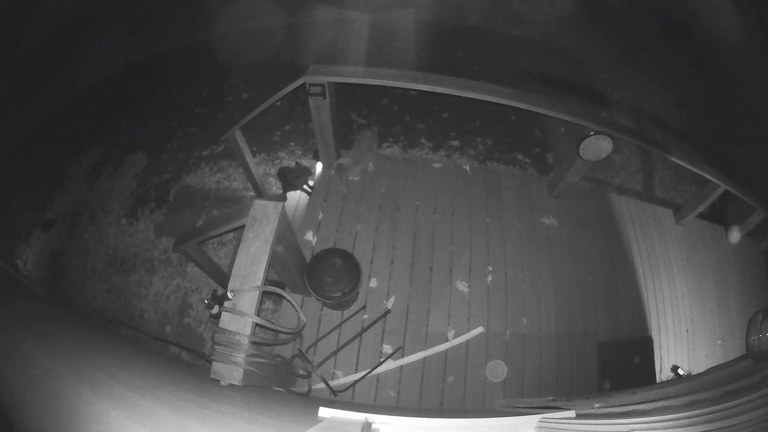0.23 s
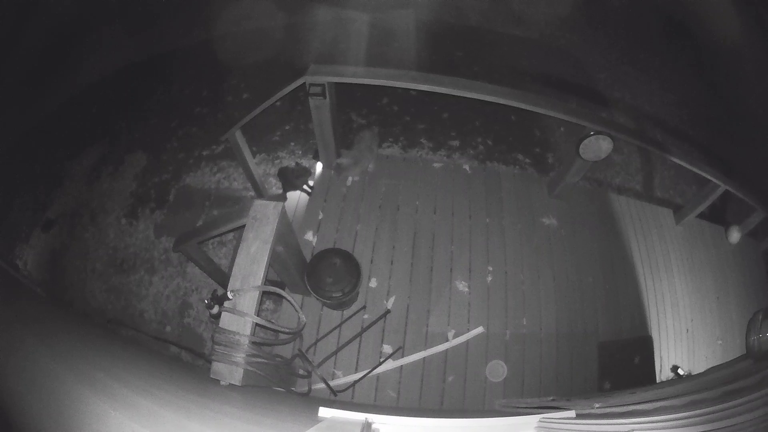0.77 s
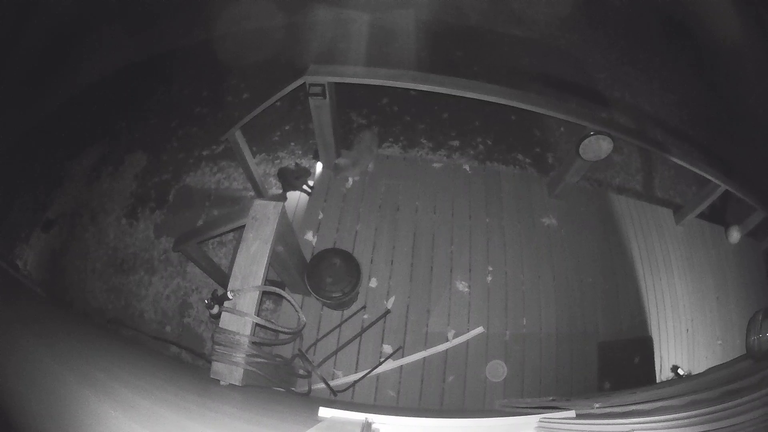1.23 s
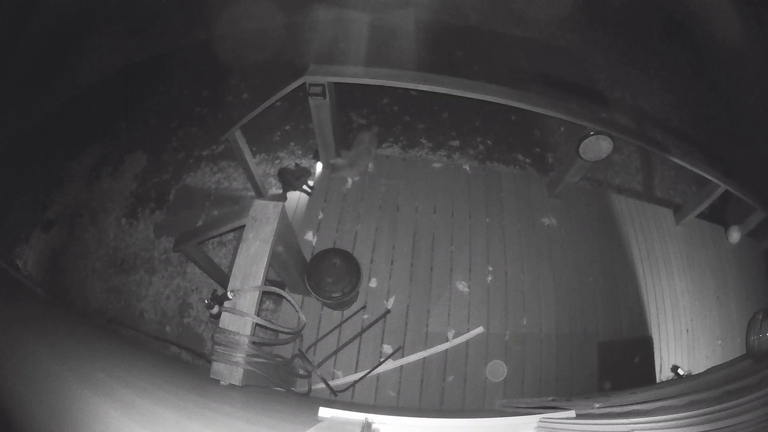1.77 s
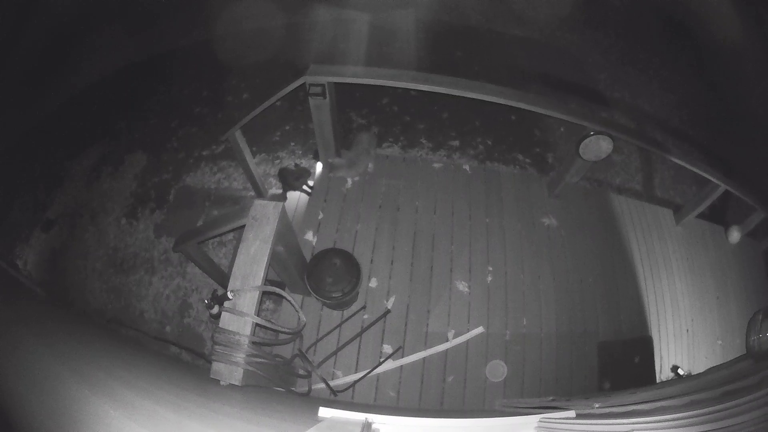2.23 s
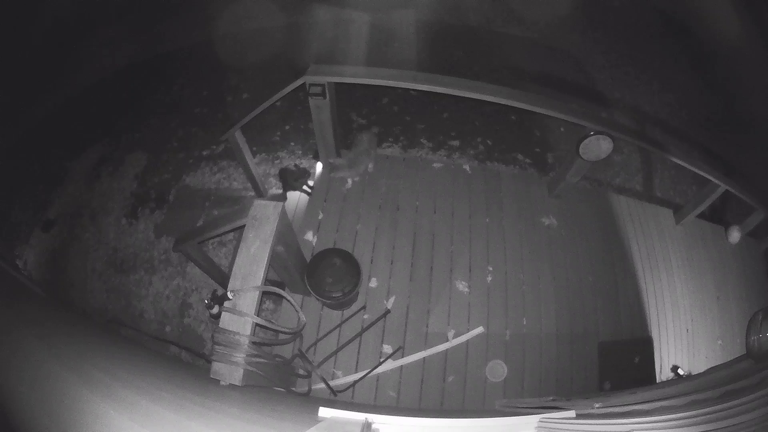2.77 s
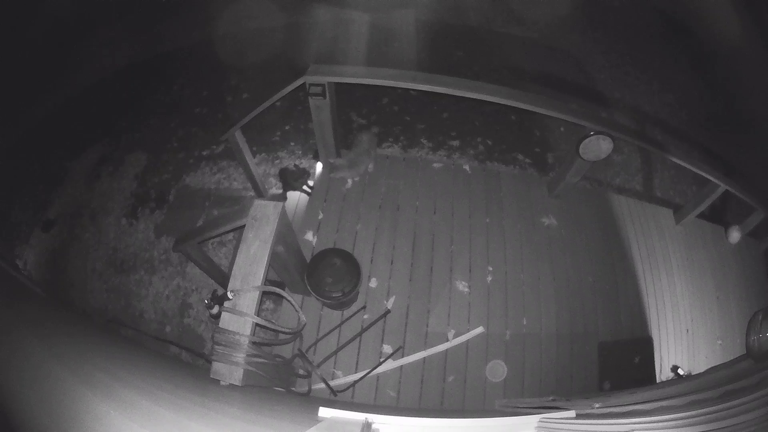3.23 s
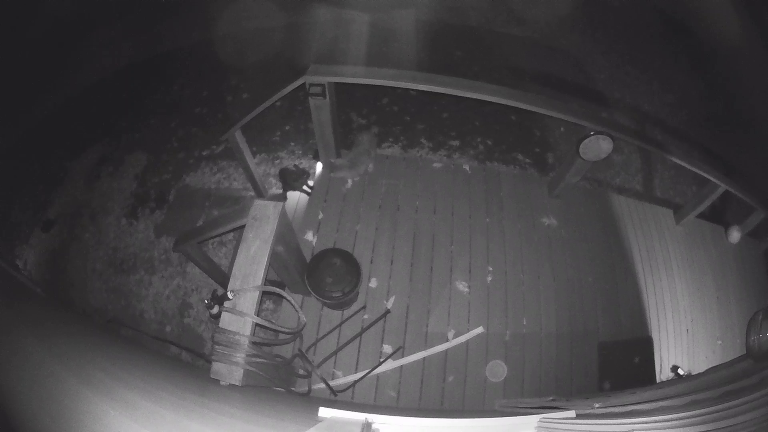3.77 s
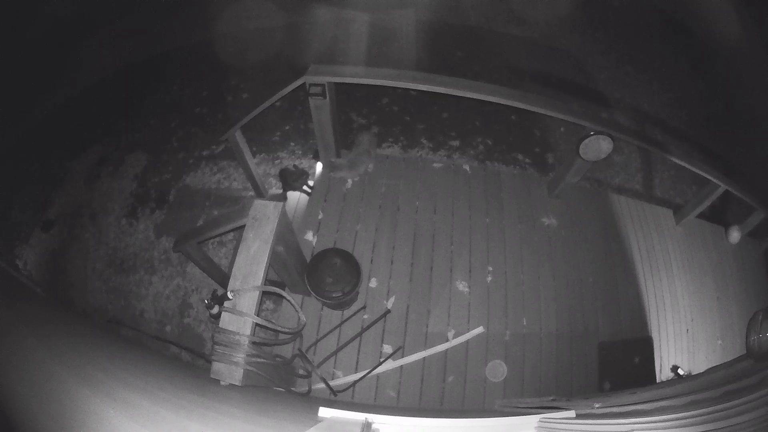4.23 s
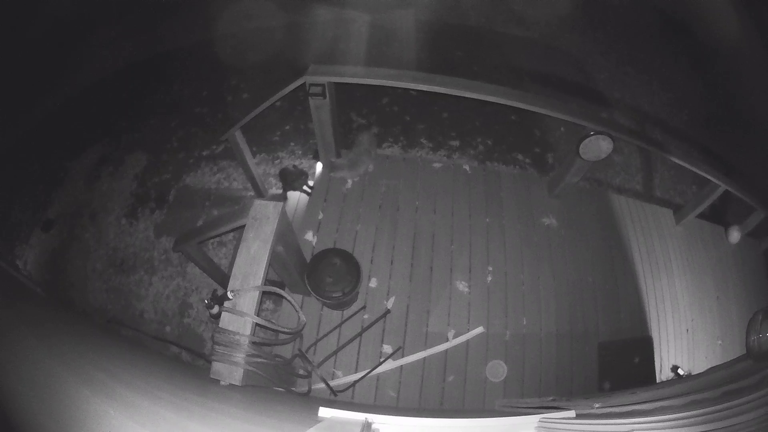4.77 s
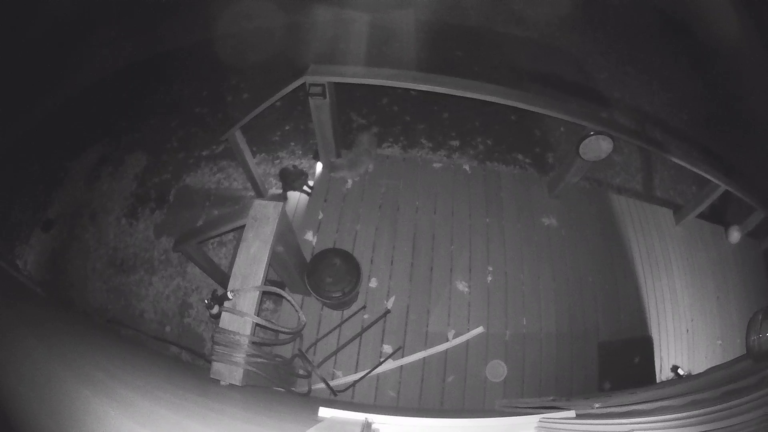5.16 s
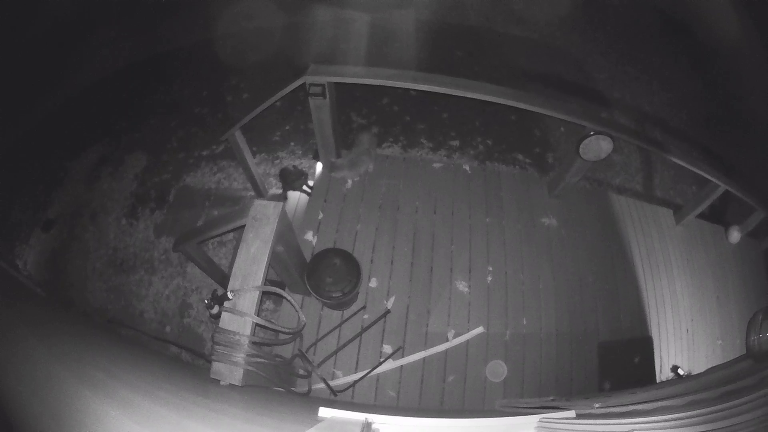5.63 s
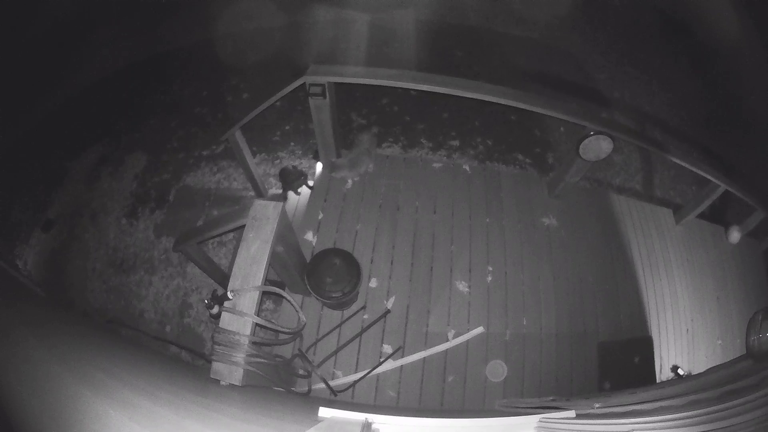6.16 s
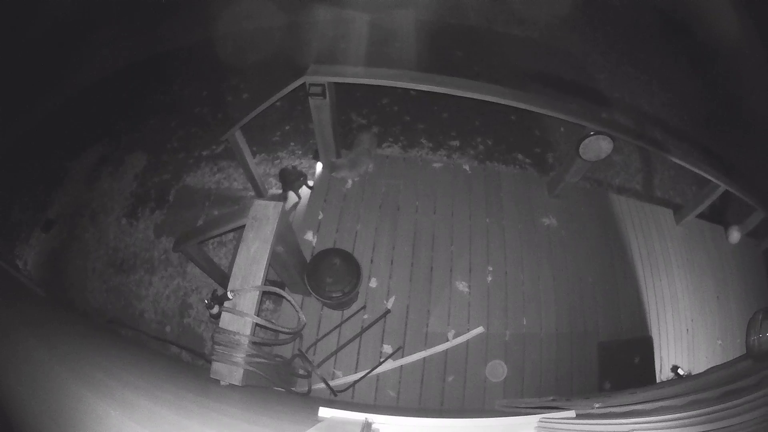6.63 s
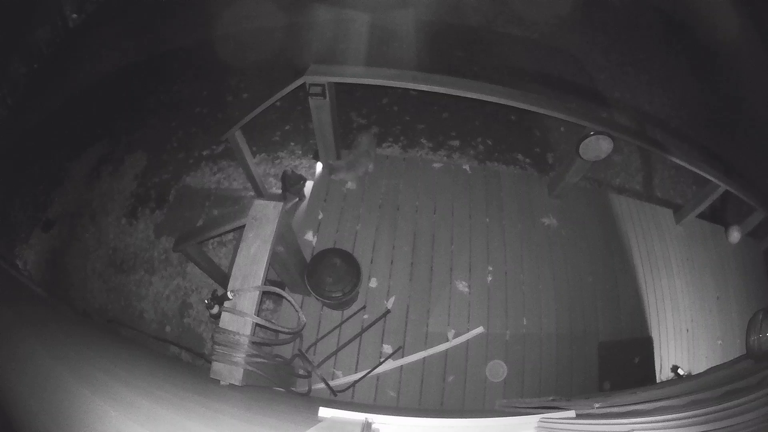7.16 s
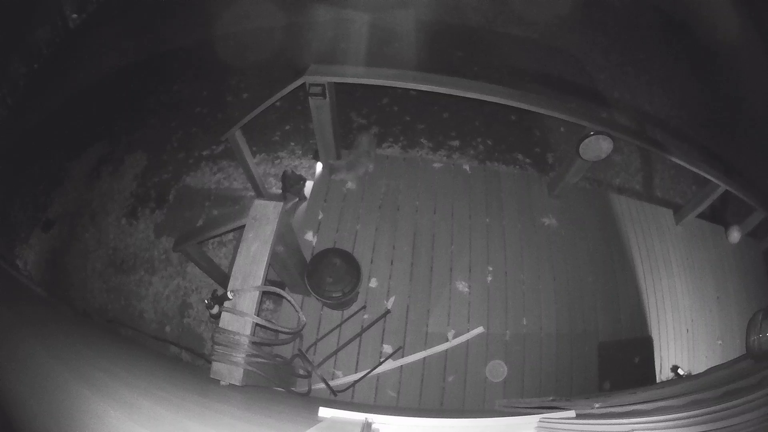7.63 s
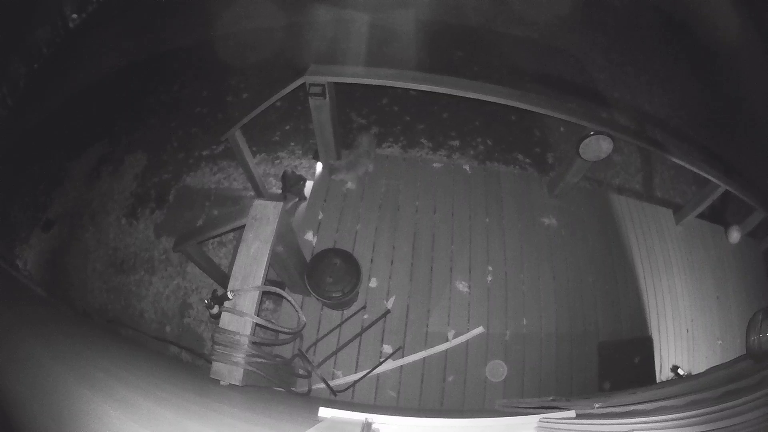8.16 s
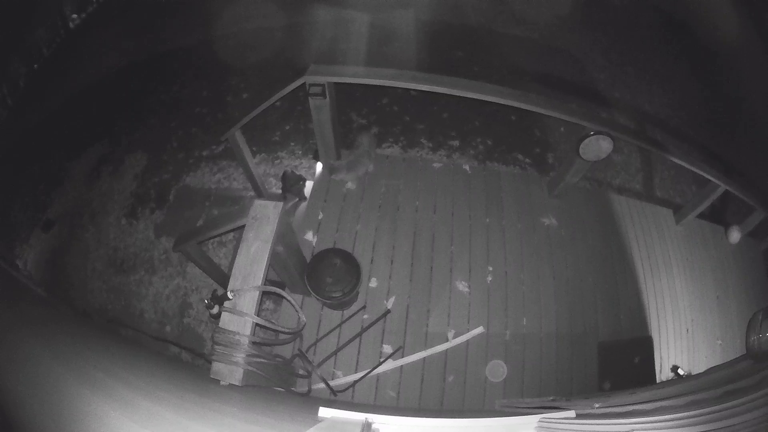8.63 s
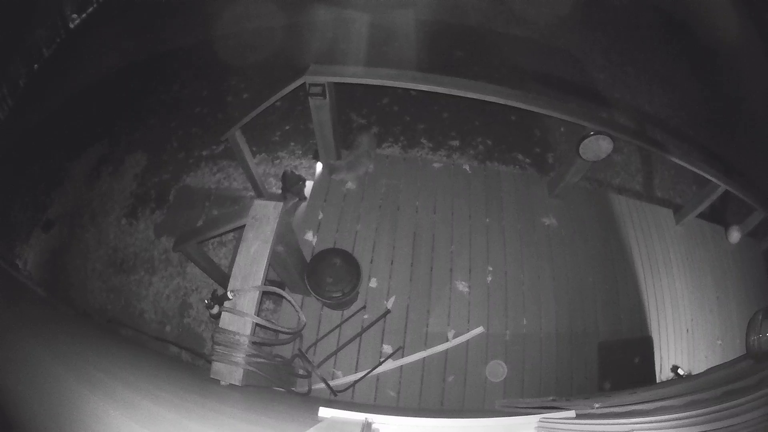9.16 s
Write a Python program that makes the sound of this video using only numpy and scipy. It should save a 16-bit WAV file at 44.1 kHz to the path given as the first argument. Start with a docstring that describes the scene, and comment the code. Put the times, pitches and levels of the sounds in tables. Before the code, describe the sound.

A quiet night yard by a wooden deck, heard through a small security camera with slightly dull top end, faint ticking, crackle and a thin high whine. From 0 to 1.5 seconds a cat howls softly and raspily, wavering up, then sliding down. At about 0.9 a second cat cuts in, far louder, swooping up to a bright, hard, nasal yowl held with shifting vowel colour, gradually sinking and dropping off near 3.9. Faint crickets chirp, clearer around 3, 6 and 9. Tiny dry snaps come at 4.3 to 4.6. At 5.1 another strong howl swoops up, peaks near 6, and falls by 6.8 into a soft, closed-mouth moan that sags to a low growl by 8.7. From about 6.9 a distant low motor drone and rustling, flickering hiss swell to the end. Close, dry echoes, little reverberation.

```python
"""Two cats yowl at each other by a wooden deck at night, heard by a security camera.
One howls, the second cuts in over it and holds a long howl: harmonics through gliding resonances, and rasp.
Little snaps of noise follow on the deck, then a last howl sinks into a low, closed-mouth moan.
Crickets whistle faintly and the camera ticks, crackles and whines throughout over a bed of night noise;
a motor's drone of wavering sines and a two-coloured noise hiss swell towards the end."""
import sys
import numpy as np
from scipy import signal
from scipy.fft import rfft, irfft, next_fast_len
from scipy.io import wavfile
from scipy.ndimage import uniform_filter1d

SR = 44100
rng = np.random.default_rng(int(sys.argv[2]) if len(sys.argv) > 2 else 0)


def persist_wave(psi):
    """Save psi, clipped to +-1, as 16-bit WAV."""
    counts = np.round(np.clip(psi, -1, 1) * 32767).astype(np.int16)
    wavfile.write(sys.argv[1], SR, np.atleast_2d(counts).T)


N = 414082
TIME = np.arange(N) / SR


def gain_of(db):
    """Amplitude factor of a level in dB."""
    return 10 ** (np.asarray(db) / 20)


def evened(x):
    """x scaled to rms 1."""
    return x / np.sqrt(np.mean(x ** 2) + 1e-20)


def read(points, hz):
    """A spectrum's value at hz, interpolated on a log-frequency axis."""
    f, value = np.transpose(points)
    return np.interp(np.log(hz + 1), np.log(f + 1), value)


def add(mix, start_s, sound):
    """Adds sound to mix in place, cut at the end of mix."""
    part = mix[max(round(start_s * SR), 0):][:len(sound)]
    part += sound[:len(part)]


def coloured(x, spectrum):
    """x filtered by a spectrum in dB, at rms 1."""
    size = next_fast_len(len(x))
    gain = gain_of(read(spectrum, np.fft.rfftfreq(size, 1 / SR)))
    return evened(irfft(rfft(x, size) * gain, size)[:len(x)])


def wander(t, per_s):
    """Random curve of rms 1: straight lines between per_s random knots a second."""
    knots = rng.standard_normal(4000)
    return evened(np.interp((t - t[0]) * per_s, np.arange(len(knots)), knots))


def follow(rows):
    """Sample times spanned by a table and each of its curves, with rounded corners."""
    s, *columns = np.transpose(rows)
    t = np.arange(s[0], s[-1], 1 / SR)
    return t, *(uniform_filter1d(np.interp(t, s, c), size=700, mode="nearest") for c in columns)


def bump(t, centre_s, half_s):
    """A bell of height 1 around centre_s."""
    return np.exp(-((t - centre_s) / half_s) ** 2)


def echoed(x, reflections):
    """Hard surfaces return the sound a little later."""
    out = x.copy()
    for delay_s, strength in reflections:
        add(out, delay_s, strength * x)
    return out


def cats():
    """Three howls, the second overlapping the first, and the closing moan, in the yard."""
    # swoop, waver and sink: (time [s], pitch [Hz])
    first_pitch = [(0, 694.4), (.25, 707.5), (.33, 683), (.52, 684.5), (.75, 763.2), (.87, 756),
                   (1.1, 702.3), (1.32, 665), (1.47, 593), (1.55, 433)]
    answer_pitch = [(0.9, 462.4), (0.99, 611.7), (1.02, 690.5), (1.05, 720.3), (1.08, 712.7), (1.17, 739.4),
                    (1.44, 709.6), (1.53, 688.7), (1.86, 704.7), (2.25, 657.4), (2.4, 606.6), (2.43, 616),
                    (2.49, 584), (2.67, 569.3), (2.73, 556.6), (3.03, 554.2), (3.3, 563.0), (3.66, 532.5),
                    (3.75, 477), (3.81, 400), (3.87, 285)]
    last_pitch = [(5.1, 189), (5.15, 338), (5.19, 455), (5.28, 582.4), (5.4, 604.8), (5.46, 608.7),
                  (5.67, 631), (5.73, 655.6), (5.79, 662.5), (5.97, 671), (6.27, 641.6), (6.57, 609.6),
                  (6.72, 538), (6.78, 520.7), (6.84, 537)]
    # how hard the cat pushes: (time [s], effort [dB], brightness [dB/octave])
    first_effort = [(0, -54, 0), (.16, -57, -1.5), (.35, -56.5, -0.5), (.52, -54.5, 1.5), (.61, -52.5, 3.5),
                    (.68, -50, 6.5), (.82, -41.5, 5.5), (1.08, -50.5, 6.5), (1.38, -69, -6),
                    (1.502, -59, 1.5), (1.548, -87, -12)]
    answer_effort = [(0.901, -86, 5), (0.93, -57.5, 20), (0.991, -38, 4.5), (1.05, -30.5, 19),
                     (1.44, -28.5, 10), (1.5, -33.5, 3.5), (1.53, -33, 7), (2.07, -34.5, 6.9),
                     (2.19, -33, 1), (2.58, -37, -7), (2.609, -44.5, -9), (2.94, -48.5, -7.5),
                     (3.3, -40, -5.5), (3.48, -48, -6), (3.6, -44.5, -7.5), (3.66, -54, -9),
                     (3.75, -48, -16), (3.86, -62.5, -14)]
    last_effort = [(5.1, -80, -18.5), (5.16, -71.5, -17), (5.219, -44.5, -10), (5.46, -40, -0.5),
                   (5.52, -34.6, -1.5), (5.731, -31.5, 8.5), (5.97, -33.5, 13.5), (6.059, -30, 7.5),
                   (6.509, -32.4, 3), (6.599, -35, -1.2), (6.66, -33.5, 1), (6.751, -44, -1.5),
                   (6.81, -46.5, -4), (6.84, -56, -5)]
    # vowel that the strong harmonics glide through: (frequency [Hz], level [dB])
    first_vowel = [(450, -1), (750, -3), (1400, 3), (1800, -8.5), (2200, 2), (2800, -7), (3700, -16)]
    answer_vowel = [(300, -16), (600, -28.5), (850, -6), (1150, 1), (1400, -6.5), (1700, -4), (2100, -4),
                    (2450, -6), (2900, -17), (3300, -34.5), (3700, -37)]
    last_vowel = [(250.0, -8), (600.0, -18.5), (850.0, -20.5), (1100.0, -5), (1350.0, 3.5), (1650.0, -14),
                  (2000.0, -9), (2450.0, 4), (2800.0, -25), (3100.0, -30.5), (3400.0, -32)]
    # bounces right beside the cat: (delay [s], strength [ratio])
    first_bounces = [(0.00364, 0.12), (0.00566, 0.12), (0.00634, 0.12), (0.00682, 0.12), (0.00884, 0.12)]
    answer_bounces = [(0.00128, 0.35), (0.00212, 0.35), (0.0037, 0.12), (0.0053, 0.22), (0.0082, 0.12)]
    last_bounces = [(0.00136, 0.22), (0.00266, 0.12), (0.00278, 0.35), (0.00298, 0.22), (0.00372, 0.12)]
    # resonances moved by jaw and tongue:
    # (time [s], lower level [dB], lower frequency [Hz], upper level [dB], upper frequency [Hz])
    first_mouth = [(0, -61.5, 6000, -68, 7700), (.2, -65, 5170, -82, 7600), (.4, -59, 5000, -80, 7500),
                   (.6, -63, 5900, -60, 7600), (.8, -47, 5500, -59.5, 7730), (1, -57.5, 5895, -56.5, 7500),
                   (1.151, -49, 5800, -61, 7150), (1.55, -85, 5480, -74, 7160)]
    answer_mouth = [(.92, -70, 5000, -68, 7000), (1, -56, 5140, -51, 7200), (1.25, -46.5, 5900, -45, 7500),
                    (1.651, -63, 5350, -43, 7120), (2, -52.5, 5560, -43.5, 7350),
                    (2.238, -41, 5960, -46, 8050), (2.4, -49.5, 5460, -49, 8640),
                    (2.62, -48, 5320, -50, 7250), (2.9, -52.5, 5200, -61, 6600),
                    (3.15, -50, 4600, -51.5, 6020), (3.318, -58.5, 4480, -47.5, 6170),
                    (3.6, -50.5, 5020, -49.5, 5840), (3.72, -53, 4600, -64, 6800),
                    (3.869, -89, 4330, -76, 5950)]
    last_mouth = [(5.15, -88, 5440, -75, 7590), (5.244, -61, 5200, -49, 6940),
                  (5.352, -56, 5540, -39.5, 6630), (5.418, -55, 4740, -39, 7100),
                  (5.658, -52.5, 4770, -42.5, 8230), (5.766, -56, 5360, -42.5, 6950),
                  (6.096, -50, 5360, -46.5, 6600), (6.184, -51, 5350, -44, 8270),
                  (6.476, -45, 5340, -46, 6640), (6.562, -44, 5370, -45, 7670),
                  (6.744, -55, 5200, -56, 7600), (6.84, -65, 5880, -58, 6460)]
    # colour of the rasp: (frequency [Hz], relative level [dB])
    first_rasp = [(600, -43.5), (1400, -29), (1700, -8), (1900, 2), (2150, -9), (2600, -23), (3500, -19),
                  (4300, -20), (5600, -24), (7600, -29), (9500, -38), (14000, -28)]
    answer_rasp = [(500, -19.5), (1100, -54), (1480, -2.5), (1800, -6.5), (2350, 1.5), (3000, -17),
                   (3600, -9), (4300, -11), (5500, -2.5), (7300, -3), (8700, -5), (9800, -45), (14000, -24)]
    last_rasp = [(500, -17), (1100, -24), (1480, 2), (1800, -19), (2350, 9.5), (3000, -49), (3600, -23),
                 (4300, -9), (5500, -5.5), (7300, -1.5), (8700, 0), (9800, -44), (14000, -22)]
    # closed mouth: (time [s], pitch [Hz], fundamental level [dB])
    moan_curve = [(6.82, 536, -68), (7.05, 523, -59), (7.4, 453, -61), (7.65, 430, -59.5), (8, 409, -59),
                  (8.13, 402, -60), (8.28, 364, -54.5), (8.6, 195, -65), (8.66, 175, -76)]

    out = np.zeros(N)
    add(out, *howl(first_pitch, first_effort, first_vowel, first_bounces, first_mouth, first_rasp,
                   jitter=0.0034, shimmer=0.13, overtones_db=-0.5, between_db=2,
                   rasp_db=7.0, doubling_db=10))
    add(out, *howl(answer_pitch, answer_effort, answer_vowel, answer_bounces, answer_mouth, answer_rasp,
                   jitter=0.00198, shimmer=0.14, overtones_db=-3.0, between_db=3.5,
                   rasp_db=-7.5, doubling_db=-22))
    add(out, *howl(last_pitch, last_effort, last_vowel, last_bounces, last_mouth, last_rasp,
                   jitter=0.0019, shimmer=0.084, overtones_db=-3.5, between_db=2.0,
                   rasp_db=-8.0, doubling_db=-20))
    add(out, *moan(moan_curve))
    return yard(out, t60_s=.25, wet_db=-21)


def howl(pitch, effort, vowel, bounces, mouth, rasp, jitter, shimmer,
         overtones_db, between_db, rasp_db, doubling_db):
    """Vocal folds on a wavering pitch: strong harmonics, overtones, rasp, and brass in upward swoops."""
    # hard surfaces near the cats: (delay [s], strength [ratio])
    echoes = [(.0031, 0.11), (.0074, 0.17), (0.0136, 0.14), (0.019, 0.056), (.034, 0.093)]
    # roughness added in a fast slide
    slide_jitter, slide_shimmer, slide_rasp, slide_echo = 0.00382, 0.58, 0.35, 0.7
    clearing = 0.49  # dB of rasp lost per dB that the effort drops

    t, hz = follow(pitch)
    s, *columns = np.transpose(effort)
    effort_db, brightness = (np.interp(t, s, c) for c in columns)

    # 0 below 0.6 octaves/s, 1 above 2.6: the voice cracks and flutters where its pitch slides fast
    octaves_per_s = abs(np.gradient(np.log2(hz))) * SR
    slide = np.clip(octaves_per_s / 2 - .3, 0, 1)
    jitter = jitter + slide_jitter * slide
    shimmer = shimmer + slide_shimmer * slide
    wavering_hz = hz * (1 + jitter * wander(t, 60) + .0012 * wander(t, 400))
    phase = 2 * np.pi * np.cumsum(wavering_hz) / SR

    low = strong_harmonics(t, hz, phase, effort_db, brightness, vowel, shimmer)
    low = echoed(low, bounces)
    # in a slide the later echoes lag at another pitch and beat against the voice
    low = low + slide_echo * slide * (echoed(low, echoes) - low)
    rising = slide * (np.gradient(hz) > 0)
    low = low + rising ** 2 * gain_of(effort_db) * echoed(brass(hz, phase), echoes)

    high, strain = overtones(t, hz, phase, mouth, between_db)
    air, halves = throat_rasp(t, phase, rasp)
    # the voice clears when the cat eases off
    clear = gain_of(clearing * (effort_db - effort_db.max()))
    rough_mix = gain_of(rasp_db) * (1 + slide_rasp * slide) * air + gain_of(doubling_db) * halves
    rough = strain * clear * rough_mix

    voice = np.sqrt(2) * (low + gain_of(overtones_db) * echoed(high, echoes)) + rough
    fade_out = np.clip((t[-1] - t) / 0.018, 0, 1)
    return t[0], voice * fade_out


def strong_harmonics(t, hz, phase, effort_db, brightness, vowel, shimmer):
    """Five lowest harmonics by effort and vowel; single ones dip or flare as echoes cancel or add."""
    # brief dips and flares: (time [s], half length [s], harmonic [number], change [dB])
    dips_and_flares = [(0.036, 0.058, 2, 0.5), (0.227, 0.1, 2, -15.5), (0.24, 0.057, 3, -23),
                       (.25, 0.14, 4, 7.5), (0.604, 0.025, 2, 7.5), (0.977, 0.021, 1, 3.5),
                       (0.992, 0.026, 3, 7.5), (1.496, 0.019, 2, -12), (1.797, 0.1, 4, 5),
                       (1.864, 0.031, 2, 3.5), (1.935, 0.03, 2, -11), (2.22, 0.073, 2, 5.5),
                       (2.293, 0.015, 4, -15), (2.465, 0.15, 5, 8.5), (2.532, 0.011, 2, -31),
                       (2.572, 0.02, 2, 4.5), (2.615, 0.015, 2, -7), (2.695, 0.014, 2, 5),
                       (3.395, 0.1, 4, 6.5), (5.162, 0.019, 4, 13), (5.273, 0.016, 2, 1),
                       (5.385, .035, 4, 6), (5.45, 0.033, 4, -4), (5.304, 0.006, 2, -17),
                       (5.338, 0.039, 2, 6), (5.416, 0.03, 3, 11), (6.664, 0.025, 2, 9),
                       (6.746, 0.01, 2, -18), (6.774, 0.012, 2, 8)]
    out = np.zeros(len(t))
    for k in range(1, 6):
        octaves = np.log2(k / 2.5)
        change_db = sum(db * bump(t, at_s, half_s) for at_s, half_s, which, db in dips_and_flares
                        if round(which) == k and t[0] < at_s < t[-1])
        level_db = effort_db + brightness * octaves + read(vowel, k * hz) + change_db + .5 * wander(t, 14)
        size = gain_of(level_db) * (1 + shimmer * wander(t, 60))
        out += size * np.cos(k * phase + rng.uniform(0, 2 * np.pi))
    return out


def brass(hz, phase):
    """Harmonics 3 to 10 through a fixed spectrum: the brassy voice of a fast upward swoop."""
    # level against the effort: (frequency [Hz], level [dB])
    spectrum = [(400, -24), (1000, -16), (1800, 0.5), (2400, -7), (3100, -26), (3600, -21.5), (4300, -21),
                (6000, -41)]
    return sum(gain_of(read(spectrum, k * hz)) * np.cos(k * phase + rng.uniform(0, 2 * np.pi))
               for k in range(3, 11))


def overtones(t, hz, phase, mouth, between_db):
    """High harmonics glide through two moving resonances, so each swells and fades in turn."""
    # passed away from the resonances: (frequency [Hz], level [dB])
    throat = [(2500, -7), (3600, -25), (4100, -23), (4500, -21), (5500, -8), (7000, -12.5), (8200, -14.5),
              (8900, -8.5), (9600, -19), (10600, -24), (11600, -24), (13300, -15)]
    roll_off_db = 11  # per octave above the upper resonance
    attack_s = 0.023  # the overtones come in just after the voice
    width_hz, swell_db, flutter_db = 404, 3, 1.2

    s, *columns = np.transpose(mouth)
    lower_db, lower_hz, upper_db, upper_hz = (np.interp(t, s, c) for c in columns)
    attack = np.minimum((t - t[0]) / attack_s, 1) ** 2
    out = np.zeros(len(t))
    for k in range(6, 22):
        # away from the resonances, low overtones lean to the lower one, high overtones to the upper
        upper_share = np.interp(k * hz, [4500, 8000], [.25, .85])
        base_db = lower_db + upper_share * (upper_db - lower_db)
        above_db = -roll_off_db * np.log2(np.maximum(k * hz / upper_hz, 1))
        size = gain_of(base_db + between_db + above_db + read(throat, k * hz))
        for centre_hz, db in (lower_hz, lower_db), (upper_hz, upper_db):
            resonance = gain_of(db) / (1 + (abs(k * hz - centre_hz) / width_hz) ** 2.5)
            size = np.hypot(size, resonance)
        unsteady_db = swell_db * wander(t, 7.12) + flutter_db * wander(t, 60)
        out += size * gain_of(unsteady_db) * np.cos(k * phase + rng.uniform(0, 2 * np.pi))
    return attack * out, attack * gain_of(upper_db)


def throat_rasp(t, phase, rasp):
    """Air noise let through each cycle, and lines halfway between the harmonics."""
    air = coloured((1 + 0.37 * np.cos(phase)) * rng.standard_normal(len(t)), rasp)
    # strong and weak cycles alternate
    half_lines = sum(np.cos((k + .5) * phase) for k in range(1, 12))
    halves = coloured(half_lines, rasp) * (1 + .5 * wander(t, 56.6))
    return air, halves


def moan(rows):
    """The closed mouth leaves little but the fundamental, which sags to a growl."""
    second_db, third_db = -12.5, -24.5  # against the fundamental
    open_db, shut_s = 35.5, 0.25  # lift of the third harmonic, decaying as the mouth closes

    t, hz, level_db = follow(rows)
    phase = 2 * np.pi * np.cumsum(hz * (1 + 0.01 * wander(t, 49.65))) / SR
    closing_third_db = third_db + open_db * np.exp(-(t - t[0]) / shut_s)
    voice = np.zeros(len(t))
    for k, db in enumerate([0, second_db, closing_third_db], 1):
        voice += gain_of(level_db + db + 0.55 * wander(t, 12)) * np.cos(k * phase)
    return t[0], np.sqrt(2) * voice * signal.windows.tukey(len(t), .03)


def yard(x, t60_s, wet_db):
    """A faint diffuse tail from the garden and the house: decaying noise convolved with x."""
    t = np.arange(SR // 2) / SR
    tail = rng.standard_normal(len(t)) * gain_of(-60 * t / t60_s) * (t > .015)
    return x + gain_of(wet_db) * signal.fftconvolve(x, tail / np.linalg.norm(tail))[:N]


def snaps():
    """Tiny dry snaps on the deck, each about a millisecond or two of bright noise."""
    # (time [s], peak level [dB])
    snap_peaks = [(4.347, -39), (4.394, -49), (4.422, -49), (4.441, -48), (4.605, -47)]
    spectrum = [(2000, -21), (5000, -15), (7000, 1), (8500, -16), (12000, -20)]  # (Hz, dB)
    out, t = np.zeros(N), np.arange(512) / SR
    for at_s, peak_db in snap_peaks:
        burst = rng.standard_normal(len(t)) * np.exp(-abs(t - t.mean()) / 0.0011)
        snap = coloured(burst, spectrum)
        add(out, at_s - t.mean(), gain_of(peak_db) * snap / abs(snap).max())
    return out


def crickets():
    """Each wing stroke is a short whistle that falls in pitch."""
    # (start [s], end [s], pitch [Hz], pulse rate [1/s], pulse length [s], pitch fall [Hz],
    #  level [dB], unevenness [dB])
    songs = [(0, 12, 4237, 22, 0.012, 191, -64.5, 1.5), (2.76, 3.29, 3640, 22, 0.021, 324, -54, 1.5),
             (5.9, 6.53, 3590, 27, 0.018, 303.6, -56, -1), (7.099, 7.7, 3590, 49, 0.02, 60, -69.5, 10.5),
             (8.757, 9.33, 3710, 24, 0.019, 360, -56, -1)]
    out = np.zeros(N)
    for start_s, end_s, hz, per_s, length_s, fall_hz, db, uneven_db in songs:
        t = np.arange(0, end_s - start_s, 1 / SR)
        since_pulse_s = (t + .004 * wander(t, 9)) % (1 / per_s)
        stroke = np.minimum(since_pulse_s / length_s, 1)
        whistle = np.sin(2 * np.pi * np.cumsum(hz + fall_hz * (.5 - stroke)) / SR)
        level_db = db + uneven_db * np.minimum(wander(t, 11), 1)
        add(out, start_s, gain_of(level_db) * np.sin(np.pi * stroke) * whistle)
    return out


def camera():
    """The electronics tick once a picture, crackle at random and whine thinly."""
    frame_s = 1 / 15
    # spectra: (Hz, dB)
    tick_spectrum = [(2000, -41), (4300, -3), (5300, 1), (6300, -15), (8000, -25), (10500, 5),
                     (12000, -19), (14000, -28)]
    crackle_spectrum = [(3000, -36), (6500, -12), (7600, 1), (8400, -4), (9500, -12),
                        (12000, -16.5), (13600, -32)]
    clicks = np.diff((TIME + .03) // frame_s, prepend=0)
    ticks = coloured(clicks, tick_spectrum)
    sparks = (rng.random(N) < 160 / SR) * rng.uniform(-1.3, 1, N)  # about 160 a second
    crackle = coloured(sparks, crackle_spectrum)
    whine = np.sin(2 * np.pi * np.cumsum(10084 + 12 * wander(TIME, 30)) / SR)
    return gain_of(-76) * ticks + gain_of(-69.0) * crackle + gain_of(-75.5) * whine


def motor():
    """Wavering low sine lines of a far idling motor, swelling late."""
    # (frequency [Hz], relative level [dB])
    lines = [(31.8, -7.5), (95.4, -7), (119, -4), (127.2, -1.5), (151, -56), (158.9, -9), (271, -18.5),
             (345, -15.5), (438, -13.5)]
    # (time [s], level [dB])
    drone_level = [(0, -79), (1, -69), (5, -72), (6.78, -69.5), (6.87, -60.5), (9.39, -51.5)]
    drone = np.zeros(N)
    for hz, db in lines:
        phase = 2 * np.pi * np.cumsum(hz + 1.247 * wander(TIME, 6)) / SR
        drone += gain_of(db + 2 * wander(TIME, 19.0)) * np.sin(phase)
    return gain_of(np.interp(TIME, *np.transpose(drone_level))) * evened(drone)


def hiss():
    """A rustling hiss that swells with the motor: noise in two colours, the sizzle flickering."""
    # colours: (frequency [Hz], relative level [dB])
    body_spectrum = [(30, 12), (70, -13), (130, 24.5), (220, 3.5), (400, 12.5), (800, 2.5), (1500, 9.5),
                     (2800, 6.5), (3700, 8), (4600, 6), (5500, 5.5), (7000, -5.5), (9000, -34.5),
                     (11500, -30)]
    sizzle_spectrum = [(4000, -14), (6300, -7.5), (7200, 1.5), (7900, -5.5), (8700, -15.5), (11000, -32)]
    # level over time, before each colour's overall level:
    # (time [s], body level [dB], sizzle level [dB])
    swell = [(6.78, -49, -69), (6.86, -50.5, -57), (7.3, -51, -58), (7.8, -48.5, -53.5), (8.75, -48, -46),
             (9.39, -46, -44)]
    body_level_db, sizzle_level_db, flicker_db = -9.0, -6.0, 1.2
    surge_s, surge_half_s, surge_db = 8.6, 0.13, 4.7  # one brighter surge of the sizzle

    t, body_db, sizzle_db = follow(swell)
    sizzle_db = sizzle_db + surge_db * bump(t, surge_s, surge_half_s)
    body = gain_of(body_db + body_level_db) * coloured(rng.standard_normal(len(t)), body_spectrum)
    sizzle_gain = gain_of(sizzle_db + sizzle_level_db + flicker_db * wander(t, 39.6))
    sizzle = sizzle_gain * coloured(rng.standard_normal(len(t)), sizzle_spectrum)
    out = np.zeros(N)
    add(out, t[0], body + sizzle)
    return out


def night_air():
    """Still night air: steady coloured noise."""
    # (frequency [Hz], relative level [dB])
    spectrum = [(18, -17), (30, -0.5), (50, -2.5), (125, -12), (200, -14), (600, -13.5), (2600, -19.5),
                (3350, -11.5), (3900, -17.5), (5900, -20), (7500, -17), (9500, -21.5), (11800, -19),
                (13700, -14.5)]
    return gain_of(-59.5) * coloured(rng.standard_normal(N), spectrum)


def scene():
    """All sources summed to one channel."""
    return (cats() + snaps() + crickets() + camera() + motor() + hiss() + night_air())[None]


def record(dry):
    """The camera's band limit: a linear-phase low-pass."""
    low_pass = signal.firwin(1023, 13980, window=("kaiser", 9), fs=SR)  # edge in Hz
    return signal.oaconvolve(dry, low_pass[None], "same")


dry = scene()
out = record(dry)
persist_wave(out)
```